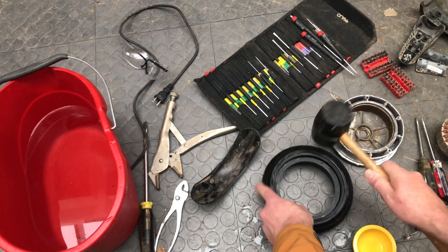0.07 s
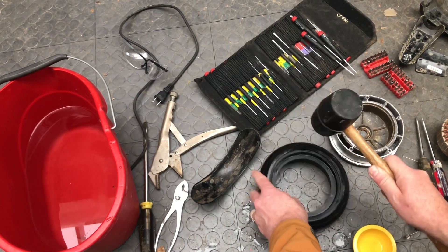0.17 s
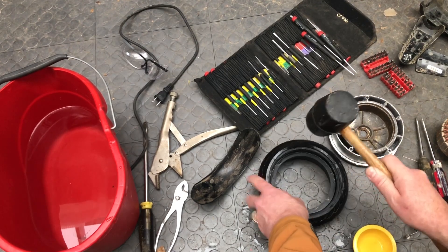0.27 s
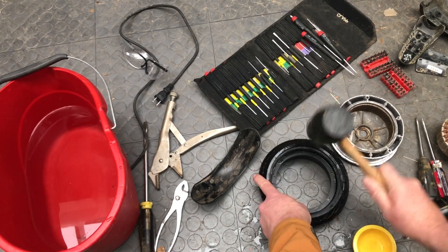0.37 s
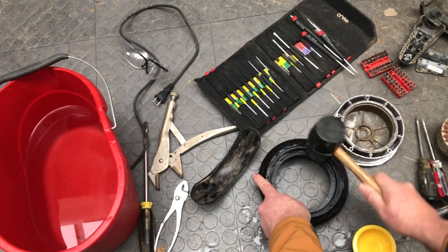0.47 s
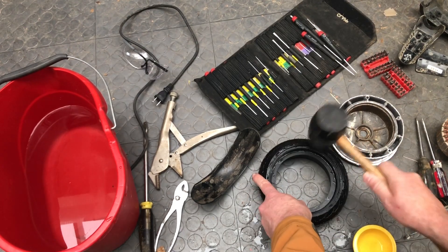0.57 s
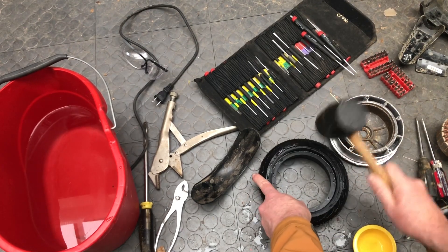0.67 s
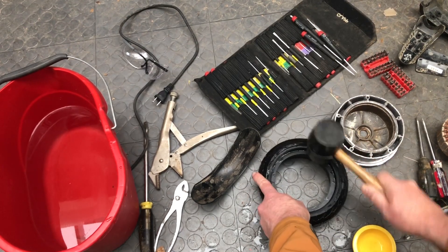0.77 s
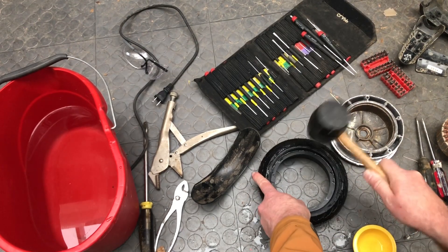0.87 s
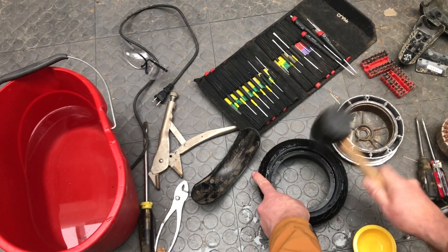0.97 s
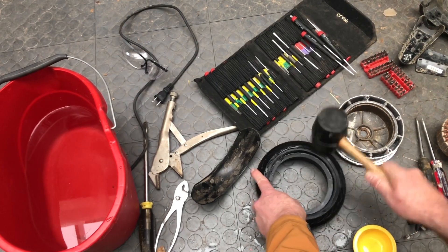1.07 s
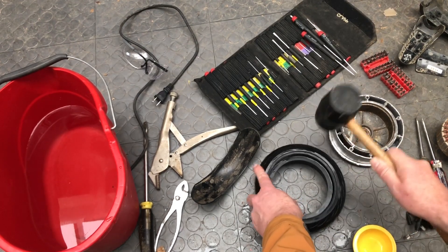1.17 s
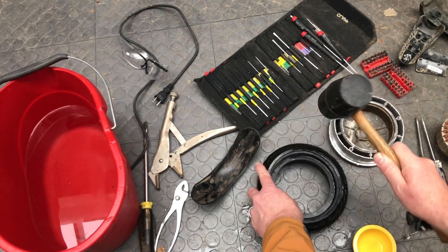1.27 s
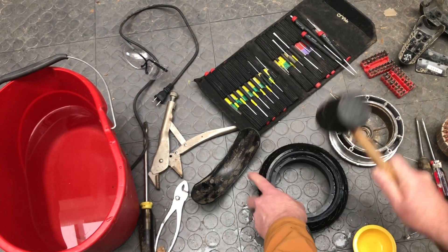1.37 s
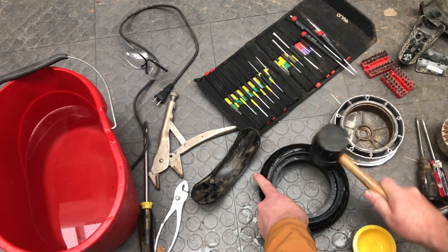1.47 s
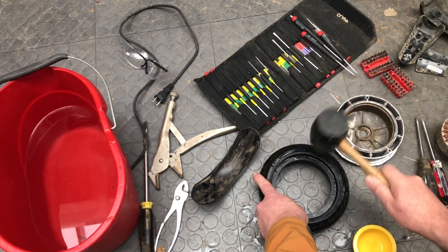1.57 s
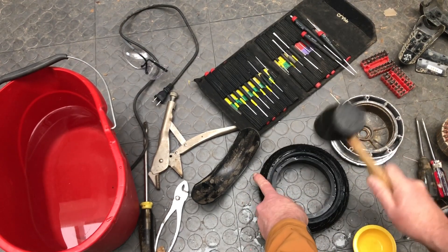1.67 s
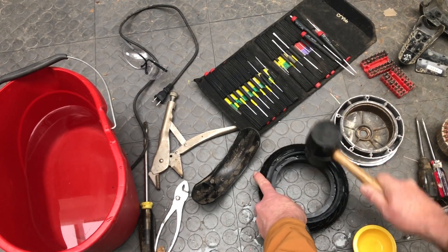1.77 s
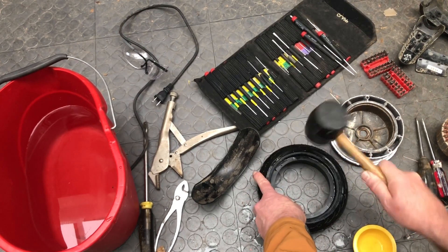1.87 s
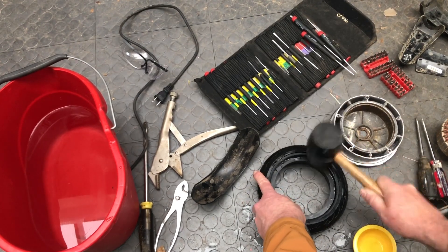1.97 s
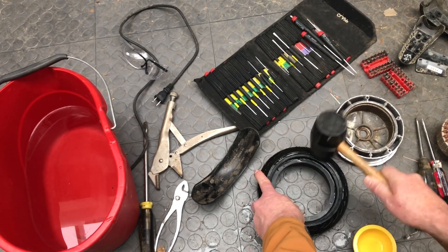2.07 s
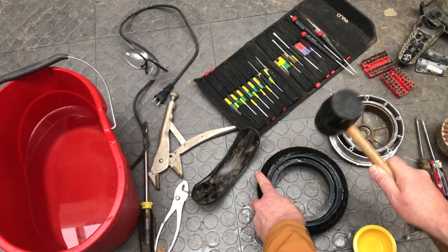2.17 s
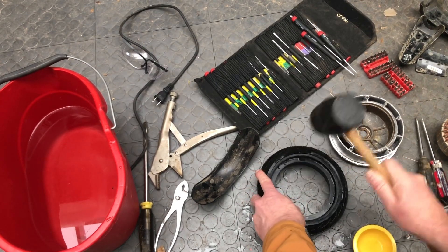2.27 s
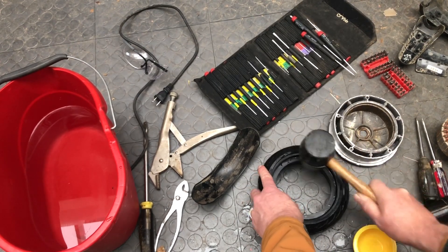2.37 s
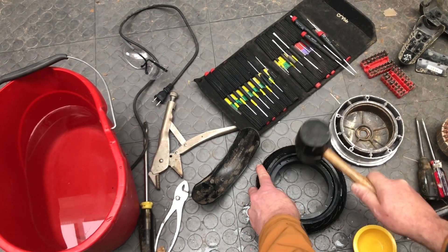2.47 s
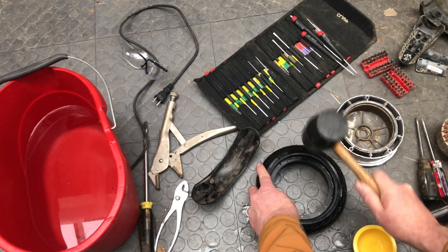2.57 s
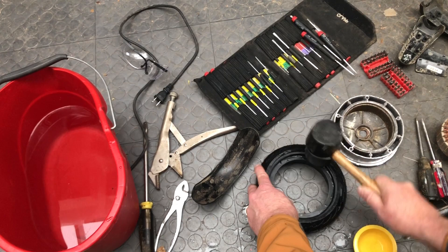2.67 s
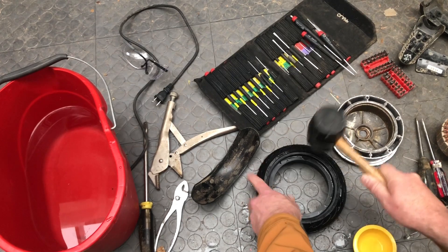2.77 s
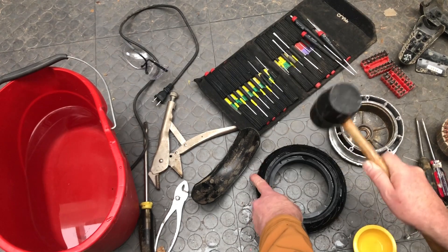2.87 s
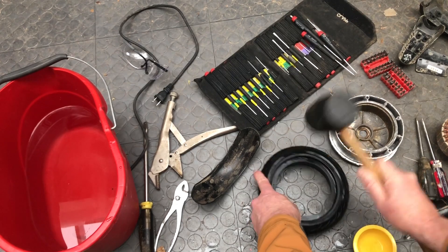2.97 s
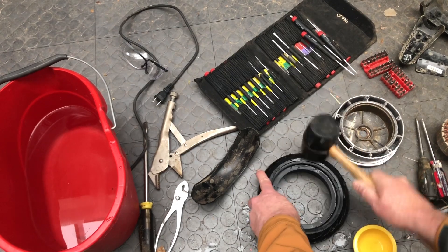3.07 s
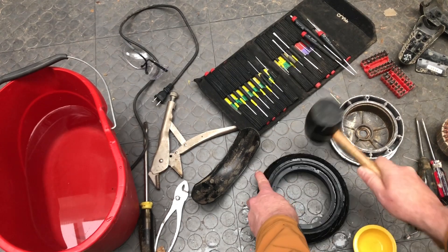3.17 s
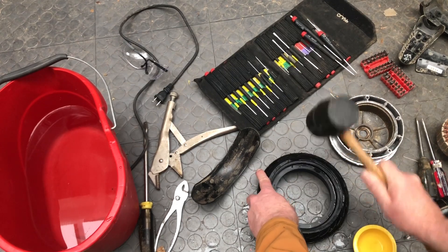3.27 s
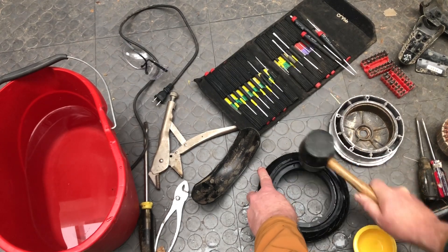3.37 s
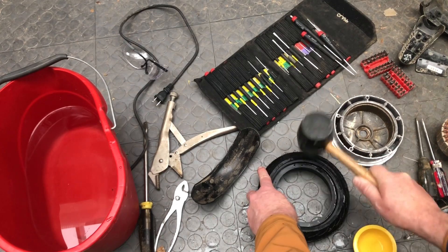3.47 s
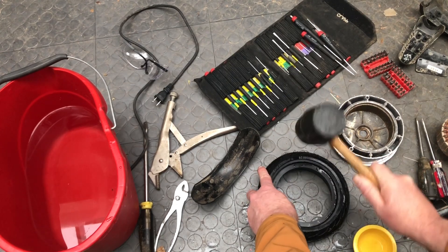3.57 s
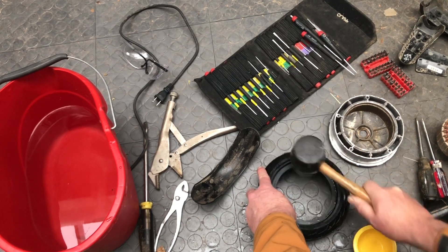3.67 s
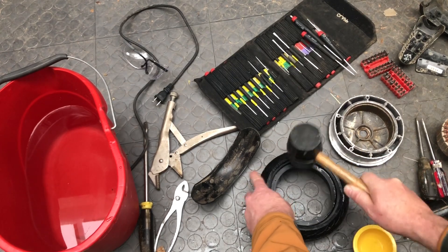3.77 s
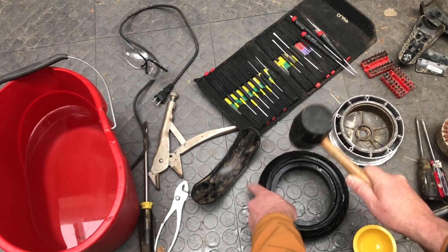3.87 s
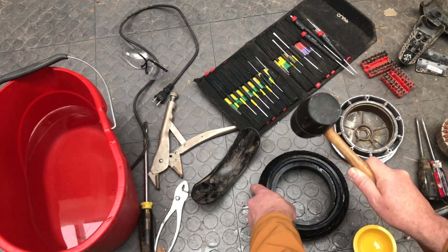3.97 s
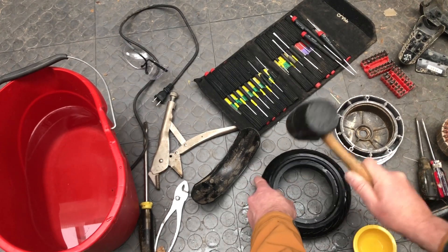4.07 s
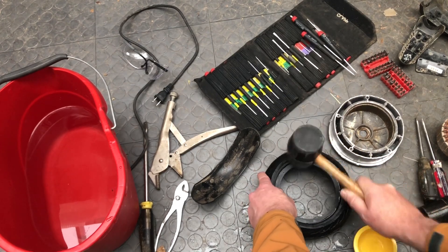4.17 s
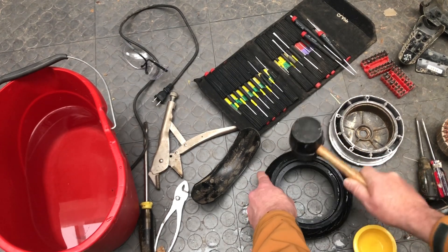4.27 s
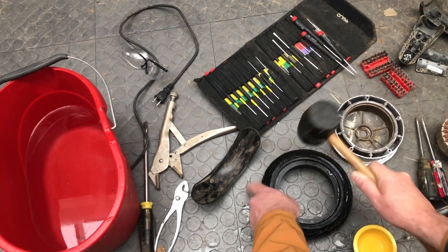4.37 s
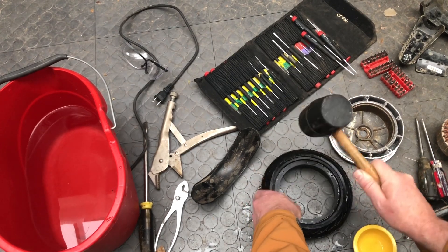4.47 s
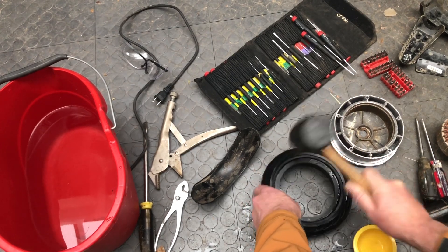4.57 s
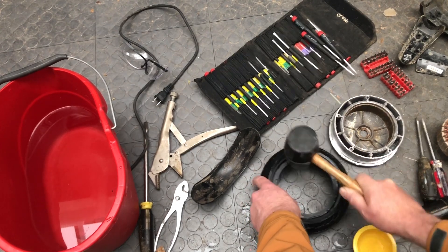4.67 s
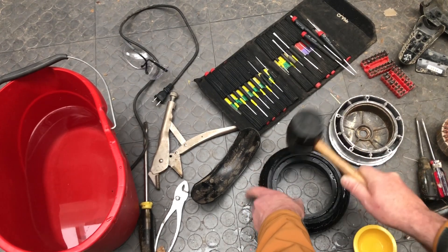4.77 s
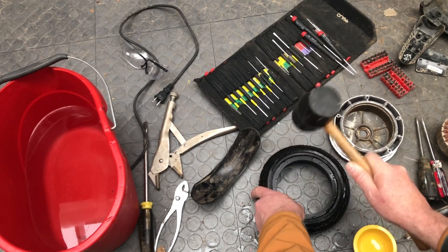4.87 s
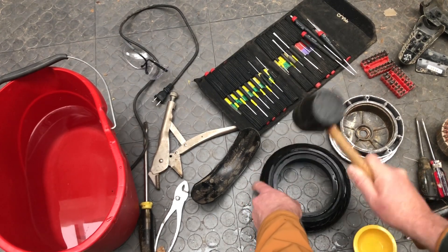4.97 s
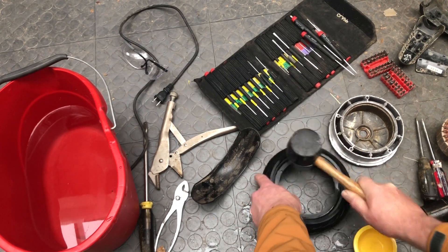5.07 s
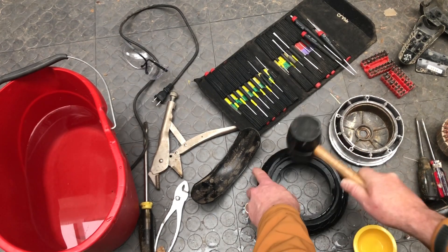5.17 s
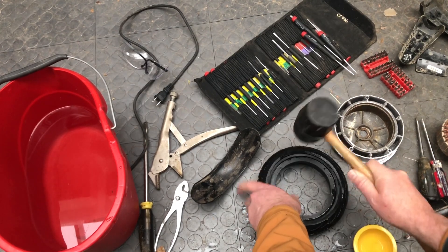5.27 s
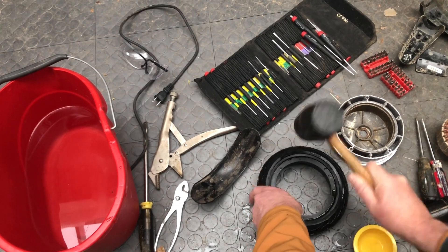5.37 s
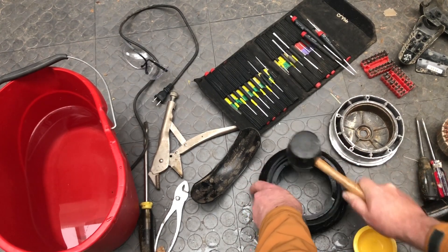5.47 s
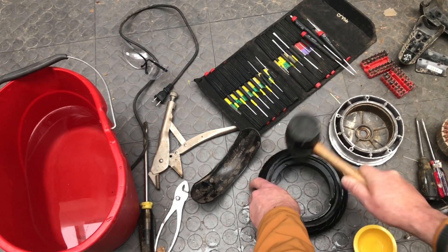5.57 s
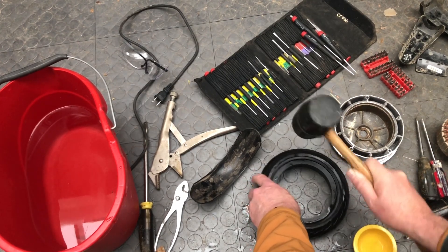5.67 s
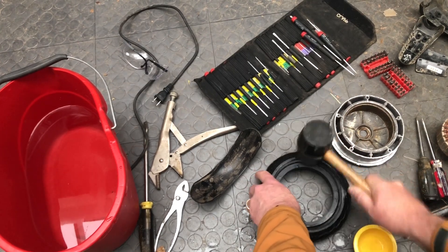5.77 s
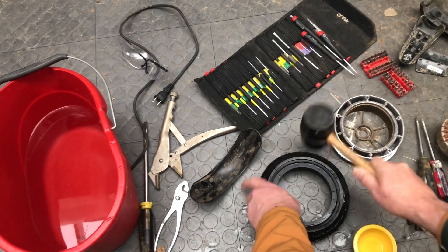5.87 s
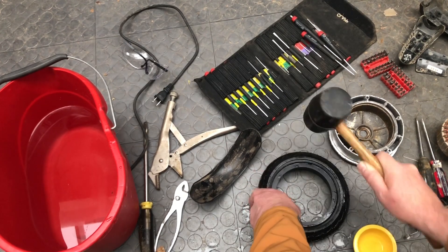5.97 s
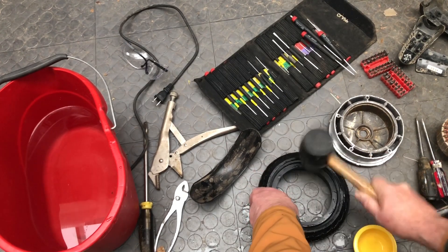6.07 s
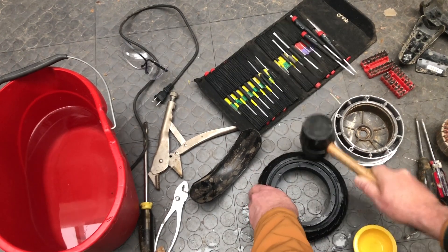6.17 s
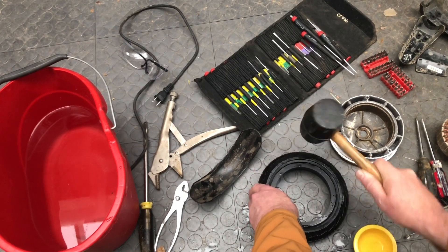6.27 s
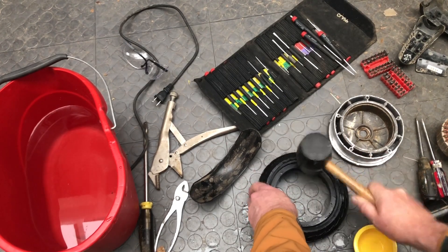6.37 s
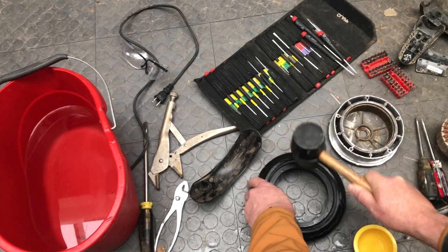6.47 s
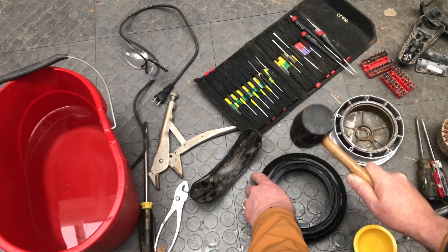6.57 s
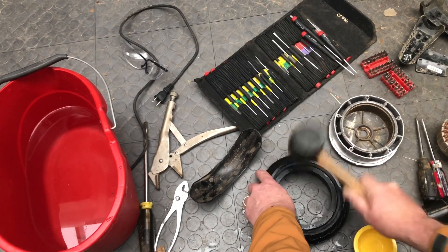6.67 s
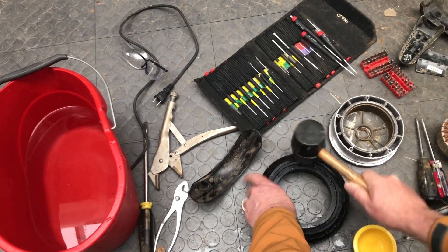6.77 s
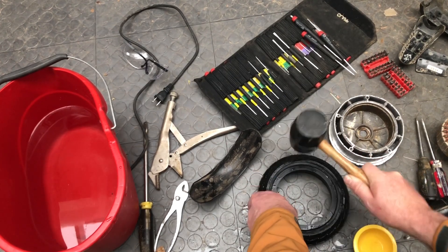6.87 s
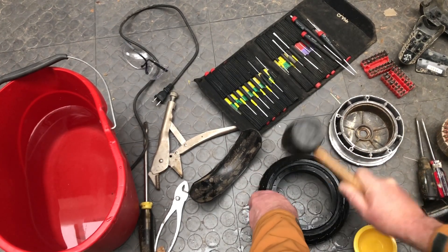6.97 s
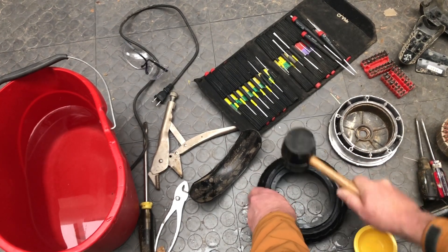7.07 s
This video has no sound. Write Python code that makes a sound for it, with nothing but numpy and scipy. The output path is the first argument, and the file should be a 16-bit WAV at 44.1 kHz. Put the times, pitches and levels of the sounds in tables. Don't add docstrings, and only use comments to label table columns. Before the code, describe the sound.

Close, dull wet mallet blows on a small rubber tire, about three a second, each followed by a bounce and a short room echo.

```python
import sys
import numpy as np
from scipy import signal
from scipy.fft import rfft, irfft
from scipy.io import wavfile
from scipy.ndimage import uniform_filter1d, minimum_filter1d

SR = 44100
rng = np.random.default_rng(int(sys.argv[2]) if len(sys.argv) > 2 else 0)


def pcm_store(signal):
    levels = np.round(np.clip(np.atleast_2d(signal), -1, 1) * 32767)
    wavfile.write(sys.argv[1], SR, levels.astype(np.int16).T)


def how_loud(loudness_db):
    steps = np.asarray(loudness_db, float) / 20
    return 10 ** steps


N = 313551
LEAD = SR // 10

# (time [s], thud pitch [Hz], slap re thud [dB], weight into floor
# and room [dB], wetness [dB])
MALLET_BLOWS = [(-0.1, 680, -5, 3, -2), (0.445, 645, -1, -3.5, -7), (0.747, 780, 4.5, -23, 0.5),
                (1.022, 775, 0, -14, 4), (1.464, 696, -4, -3, -11), (1.749, 724, -5, -0.5, -6.5),
                (1.997, 630, -12, -5, -14), (2.38, 698, -7, -1.5, -6.5), (2.64, 697, -9.5, -1.5, -12.5),
                (3.05, 670, -9, -2.5, -2.5), (3.376, 655, -1.5, -3, -5.5), (3.669, 480, 2.5, -4.5, -6),
                (4.182, 622, 4.5, -5, -5.5), (4.635, 676, -3, -1.5, -3.5), (5.08, 683, -8, -2.5, -7),
                (5.462, 687, -5.5, -1, -8.5), (5.776, 655, 2.5, -4, -6), (6.103, 728, -3, -3.5, -2.5),
                (6.397, 660, -1, -2.5, -6.5), (6.713, 604, 3.5, -3.5, -5.5), (7.04, 537, 2.5, -6.5, -2.5)]


def noise(size):
    return rng.standard_normal(size)


def unit(x):
    return x / np.sqrt(np.mean(x ** 2))


def on_log(hz, table):
    f, v = np.transpose(table)
    return np.interp(np.log(hz + 1), np.log(f), v)


def band(x, hz, width):
    return signal.lfilter(*signal.iirpeak(hz, hz / width, fs=SR), x)


def high_pass(x, order, hz):
    return signal.sosfilt(signal.butter(order, hz, "high", fs=SR, output="sos"), x)


def colour(x, table, size=4096):
    cepstrum = irfft(np.log(how_loud(on_log(np.fft.rfftfreq(size, 1 / SR), table))))
    cepstrum[1:size // 2] *= 2
    cepstrum[size // 2 + 1:] = 0
    response = irfft(np.exp(rfft(cepstrum)))
    return signal.fftconvolve(x, response)[:len(x)]


def contacts():
    # (time [s], thud peak [dB], thud pitch [Hz],
    # slap re thud [dB], weight [dB])
    landings = [(0.026, -12.5, 340, -1, -6), (0.477, 0, 349, -12, -16.5), (0.77, 0.5, 506, -5, -6.5),
                (1.066, 2, 610, 1, -18), (1.509, -1.5, 384, -3.5, -9), (1.786, -7.5, 320, 0, -4),
                (2.019, -6.5, 528, -26, -6), (2.413, -5.5, 334, -5, -7), (2.674, -6, 321, -16, -7),
                (3.076, -4.5, 448, -13, -4.5), (3.084, -4, 468, -8, -9), (3.415, -3.5, 320, 2.5, -9),
                (3.7044, -0.5, 410, -0.5, -9), (4.683, 5.5, 514, -3, -8.5), (5.102, -2.5, 356, -2.5, -6),
                (5.501, -1.5, 353, 4.5, -5.5), (5.815, 1, 648, 0, -12), (6.1422, 2, 595, 7.5, -32),
                (6.438, 3.5, 528, 5, -14.5), (6.743, -5, 563, -11, -13), (6.826, -5.5, 366, 2.5, -5)]
    # (time [s], thud peak [dB], thud pitch [Hz], slap re thud [dB])
    wobbles = [(0.202, -22, 760, -9), (0.309, -26, 463, -17), (1.322, -29.5, 221, -22),
               (2.067, -11.5, 322, -7), (2.469, -12, 320, -3.5), (2.7284, -8.5, 423, -5),
               (2.78, -33, 463, -11), (3.474, -12, 480, -17), (3.778, -4.5, 632, -8.5),
               (5.115, -11, 460, 0.5), (5.596, -13.5, 472, -7.5), (6.519, -14, 320, -5)]
    blow_db, landing_wet_db = 0.4, -8
    wobble_weight_db, wobble_wet_db = -8, -10.5
    brush_lead_s, brush_db = 0.011, -35.5

    rows = [(s, blow_db, hz, slap_db, weight_db, wet_db) for s, hz, slap_db, weight_db, wet_db in MALLET_BLOWS]
    rows += [(*row, landing_wet_db) for row in landings]
    rows += [(*row, wobble_weight_db, wobble_wet_db) for row in wobbles]
    rows += [(s - brush_lead_s, brush_db, 520, -30, -12, -12) for s, *_ in MALLET_BLOWS if s > 0]
    return sorted(rows)


def thud_of(hz, t):
    first_touch_hz, spread_s = 543, 0.003363
    ring_db, ring_db_per_octave, ring_t60_s = -8.5, 10.5, 0.11
    start_turn = rng.normal(0, 0.017)
    fall = (0.944 * hz + first_touch_hz) * spread_s * (1 - np.exp(-t / spread_s))
    cycles = 0.4406 * hz * t + fall
    swell = (t / 0.0035) ** 4.2 * np.exp(4.02 * (1 - t / 0.0033))
    thud = swell * np.sin(2 * np.pi * (cycles + start_turn))
    fade_db = ring_db - ring_db_per_octave * np.log2(hz / 320) - 60 * t / ring_t60_s
    ring_onset = 1 - np.exp(-(t / 0.0089) ** 2)
    return thud + how_loud(fade_db) * ring_onset * np.sin(2 * np.pi * hz * t)


def slap_of(slap_db, t):
    grit = noise(len(t))
    slap = band(grit, 1550, 2180) + how_loud(-12) * grit
    return how_loud(slap_db + 5.5) * slap * (t / 0.0019) ** 2.8 * np.exp(2.29 * (1 - t / 0.0017))


def slab_boom(t):
    # (frequency [Hz], level re thud [dB], t60 [s])
    slab_modes = [(61.5, -8, 0.095), (106, -13.5, .12), (180.4, -11.5, 0.042), (320, -13.5, 0.079),
                  (477, -15.5, 0.14)]
    boom = sum(how_loud(db - 60 * t / t60) * np.sin(2 * np.pi * hz * t) for hz, db, t60 in slab_modes)
    return boom * (1 - np.exp(-(t / 0.02) ** 2))


def blows():
    places = 4
    t = np.arange(2 * LEAD) / SR
    near, far = np.zeros(N + 4 * LEAD), np.zeros((places, N + 4 * LEAD))
    slab = slab_boom(t)
    for k, (s, db, hz, slap_db, weight_db, wet_db) in enumerate(contacts()):
        boom = how_loud(weight_db + 8.5) * slab
        push = (t * hz / 0.19) * np.exp(1 - t * hz / 0.29)
        shove = how_loud(weight_db + 5) * np.gradient(push) * SR / hz / 12
        click = how_loud(wet_db + slap_db + 22) * (t == 0)
        start = int(s * SR) + LEAD
        at = slice(start, start + 2 * LEAD)
        near[at] += how_loud(db + 3.0) * (thud_of(hz, t) + slap_of(slap_db, t) + boom)
        far[k % places, at] += how_loud(db + 4.5) * (shove + click)
    return near[:N + LEAD], far[:, :N + LEAD]


def drags():
    # (start [s], length [s], level [dB], swell from start to end [dB],
    # wet hiss re level [dB])
    pulls = [(0.0, 0.111, -30.5, -1, -4.5), (0.106, 0.24, -33.5, -13, 7.5), (1.189, 0.13, -37, 1, 4),
             (2.177, 0.045, -41, -5, -9), (2.269, 0.26, -41, 5, -1), (2.921, 0.13, -34.5, 15, 1.5),
             (3.991, 0.23, -39.5, 4.5, 6.5), (4.524, 0.12, -38, 2, 11), (4.925, 0.31, -34, 5, 2.5),
             (5.263, 0.073, -52, -15.5, -13), (5.412, 0.12, -37.5, 5, 2), (5.603, .165, -37.5, 0, 1),
             (5.94, 0.086, -54, -14, -13), (6.595, 0.11, -39.5, -1, -30)]
    # (frequency [Hz], width [Hz], level [dB])
    tire_modes = [(321, 58, 4.5), (528, 150, -1), (722, 180, -5.5)]
    attack_s, release_s = 0.031, 0.011
    jerk_db, jerk_s = 1.3, 0.025
    slips_per_s, slip_scatter_db = 2500, 1.5
    sheen_db = 6

    t = (np.arange(N + LEAD) - LEAD) / SR
    level, wet = np.zeros(len(t)), np.zeros(len(t))
    jerks = how_loud(jerk_db * unit(uniform_filter1d(noise(len(t)), int(jerk_s * SR))))
    for s, length, db, swell_db, wet_db in pulls:
        edge = np.clip(np.minimum((t - s) / attack_s, (s + length - t) / release_s), 0, 1)
        swell = swell_db * np.clip((t - s) / length - 0.5, -0.5, 0.5)
        pull = edge * jerks * how_loud(db + swell)
        level += pull
        wet += pull * how_loud(wet_db)
    slips = noise(len(t)) * (rng.random(len(t)) < slips_per_s / SR)
    slips = slips * how_loud(slip_scatter_db * rng.exponential(size=len(t)))
    body = sum(how_loud(db) * band(band(slips, hz, width), hz, 2 * width) for hz, width, db in tire_modes)
    spits = how_loud(3 * unit(uniform_filter1d(noise(len(t)), 130))) * noise(len(t))
    sheen = high_pass(spits, 2, 5000)
    return level * unit(body) + wet * (unit(spits) + how_loud(sheen_db) * sheen)


def ticks():
    # (time [s], peak level [dB])
    small_films = [(0.2503, -46), (3.9504, -63), (3.9893, -56), (0.4758, -58), (0.7696, -43), (1.145, -36.5),
                   (1.2141, -44), (1.297, -50), (1.51, -55), (1.5576, -45), (1.771, -48), (2.293, -48),
                   (2.6715, -37), (2.928, -49), (2.9537, -56), (2.9893, -37.5), (3.0086, -47), (4.018, -60),
                   (4.048, -51), (4.133, -48), (4.5448, -57), (4.6813, -47), (5.0389, -53), (5.1, -49.5),
                   (5.498, -35), (5.8162, -23.5), (6.144, -26), (6.418, -47), (6.4384, -46), (6.8279, -34)]
    crack_db, small_film_db, lag_s = -24.5, -7.5, 0.0023

    t = np.arange(900) / SR
    out = np.zeros(N + LEAD + len(t))
    cracks = [(s, db + small_film_db) for s, db in small_films]
    cracks += [(s, crack_db + wet_db) for s, *_, wet_db in MALLET_BLOWS]
    fade = np.exp(-t / 0.0016) + how_loud(-14.5) * np.exp(-t / 0.0038)
    for s, db in cracks:
        at = int((s + lag_s) * SR) + LEAD
        out[at:at + len(t)] += how_loud(db + 49) * noise(len(t)) * fade
    return high_pass(out[:N + LEAD], 4, 6500)


def room(x):
    # (frequency [Hz], t60 [s])
    echo_t60 = [(100, 0.46), (260, 0.23), (700, 0.39), (1840, 0.47), (4850, 0.52), (12800, 0.17)]
    # (frequency [Hz], level [dB], t60 [s])
    room_rings = [(327.3, 1.5, 0.38), (463, -23, 0.32), (642, -11, 0.77), (741, -8, 0.74), (782, 5.5, 0.34),
                  (950, -18, 0.45), (1075, -14.5, 0.35), (1130, -6, 0.32), (2010, -4, 0.4),
                  (1960, -33.5, 0.21), (2130, -18.5, 0.59), (4700, -5, 0.3), (3000, -8, 0.4),
                  (3280, -1.5, 0.22)]
    gap_s, rise_s = 0.0125, 0.0049
    sparse_db, rings_db = 4, -3.5
    clutter_db, clutter_t60_s = -16.5, 0.13

    t = np.arange(SR * 3 // 4) / SR
    lumps = how_loud(sparse_db * np.exp(-t / 0.019) * unit(uniform_filter1d(noise(len(t)), 60)))
    echoes = 0
    for hz in 60 * 2 ** np.arange(0, 8.1, 0.5):
        echoes = echoes + band(noise(len(t)), hz, hz / 3) * how_loud(-60 * t / on_log(hz, echo_t60))
    rings = sum(how_loud(db - 60 * t / t60) * np.sin(2 * np.pi * (hz * t + rng.random()))
                for hz, db, t60 in room_rings)
    walls = unit(echoes * lumps) + how_loud(rings_db - 19.5) * unit(rings)
    walls = walls * (1 - np.exp(-t / rise_s))
    tail = np.roll(walls / np.sqrt(np.sum(walls ** 2)), int(gap_s * SR))
    tail += how_loud(clutter_db - 18 - 60 * t / clutter_t60_s) * noise(len(t))
    return signal.fftconvolve(x, tail)[:len(x)]


def shop():
    # (frequency [Hz], level per Hz [dB])
    air_spectrum = [(18, -44), (30, -28.5), (295, -0.5), (740, -18.5), (1280, -16.5), (2290, -7),
                    (5040, -43), (6900, -29.5), (8740, -47), (15750, -34.5),
                    (15950, -80)]
    # (frequency [Hz], rms level [dB], width [Hz])
    hum_tones = [(58.5, -67, 16), (137.9, -56.5, 2.9)]
    air = how_loud(-50) * unit(colour(noise(N), air_spectrum))
    hum = sum(how_loud(db) * unit(band(band(noise(N), hz, width), hz, width)) for hz, db, width in hum_tones)
    return air + hum


def scene():
    # (frequency [Hz], gain [dB])
    phone_ports = [(40, -25), (120, -11.5), (300, 0), (900, -2.5), (1400, -9), (2300, -3), (2720, -16),
                   (2900, -10), (3500, -21), (4100, -28.5), (4750, -35), (5100, -40.5), (6200, -32.5),
                   (7000, -21), (7800, -37), (8800, -47.5), (11700, -54.5),
                   (11800, -61), (12300, -40), (13200, -53), (15000, -40.5), (15750, -46), (15950, -64.5)]
    # (frequency [Hz], width [Hz], level added [dB])
    case_rings = [(2890, 110, 2), (4520, 260, 2)]
    near, far = blows()
    small = drags() + ticks()
    far[0] += how_loud(-12.5) * small
    echoes = sum(room(spot) for spot in far)
    heard = colour(near + small + echoes, phone_ports)
    heard = heard[LEAD:] + shop()
    case = sum(how_loud(db) * band(heard, hz, width) for hz, width, db in case_rings)
    return (heard + case)[None]


def low_pass(x):
    return signal.sosfilt(signal.butter(12, 16990, fs=SR, output="sos"), x)


def record(dry):
    ceiling, ahead_s, hold_s, recover_s = 0.95, 0.00072, 0.0064, 0.01
    need = np.minimum(1, ceiling / (np.abs(dry) + 1e-9))
    hold, ahead = int(hold_s * SR), int(ahead_s * SR)
    held = minimum_filter1d(need, hold + 2 * ahead, origin=hold // 2, axis=1)
    held = uniform_filter1d(held, ahead, axis=1)
    keep = np.exp(-1 / (recover_s * SR))
    slow = 1 - signal.lfilter([1 - keep], [1, -keep], 1 - held)
    return low_pass(dry * np.minimum(held, slow))


dry = scene()
out = record(dry)
pcm_store(out)
```